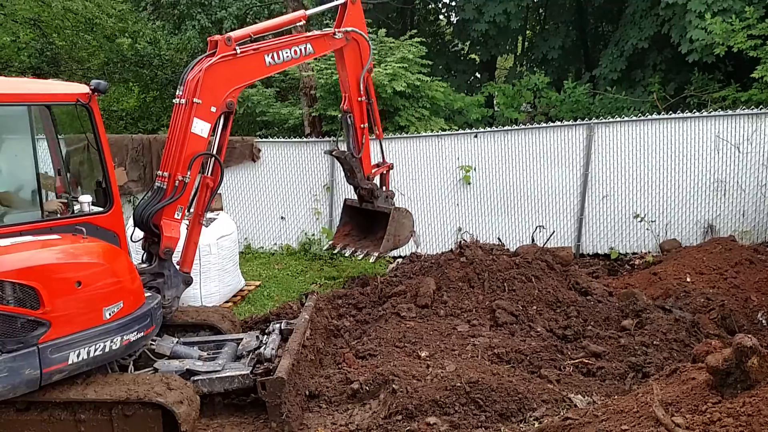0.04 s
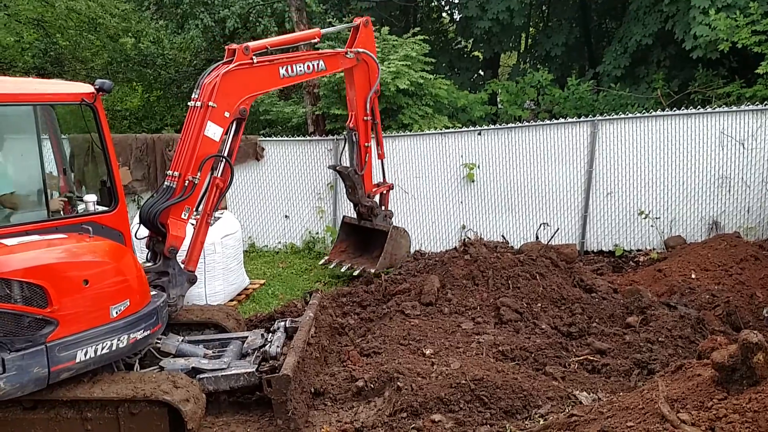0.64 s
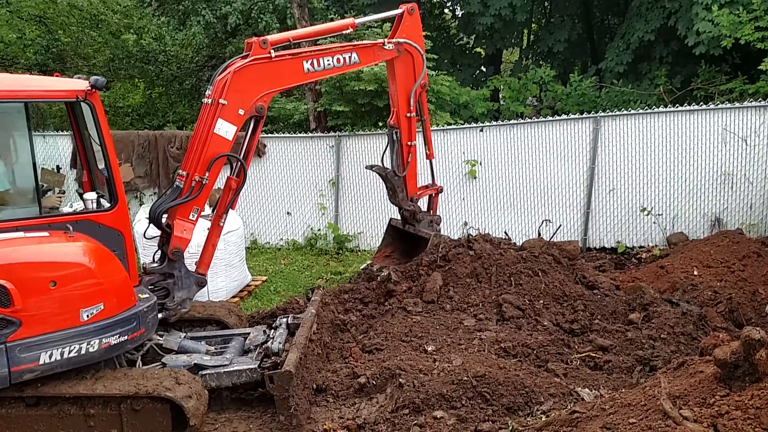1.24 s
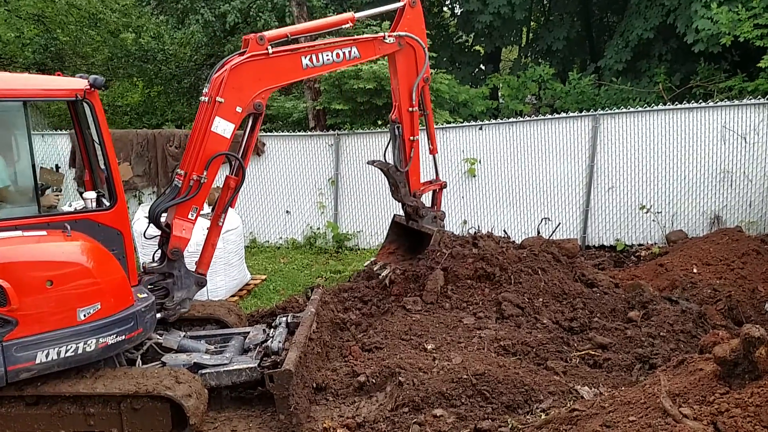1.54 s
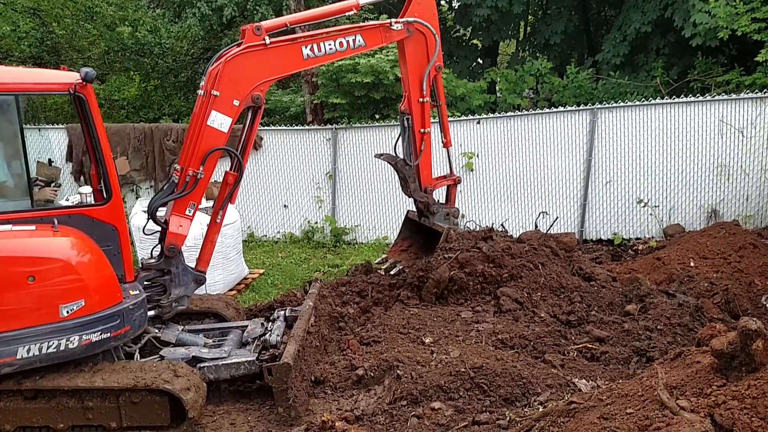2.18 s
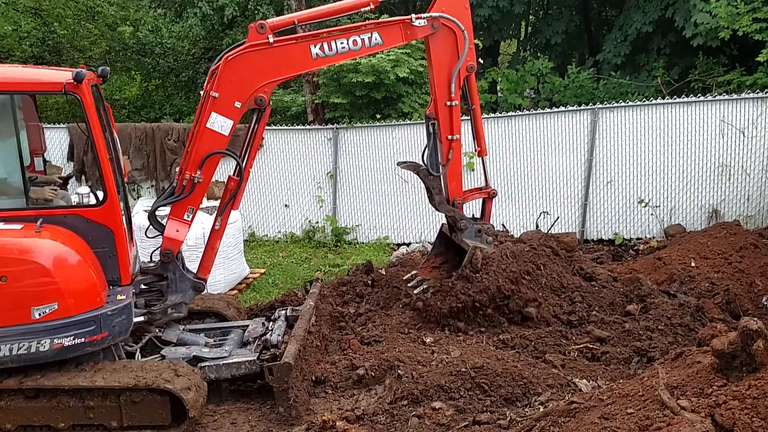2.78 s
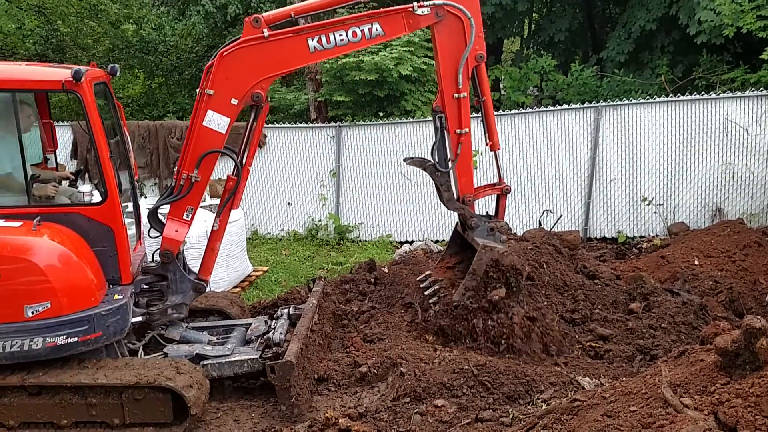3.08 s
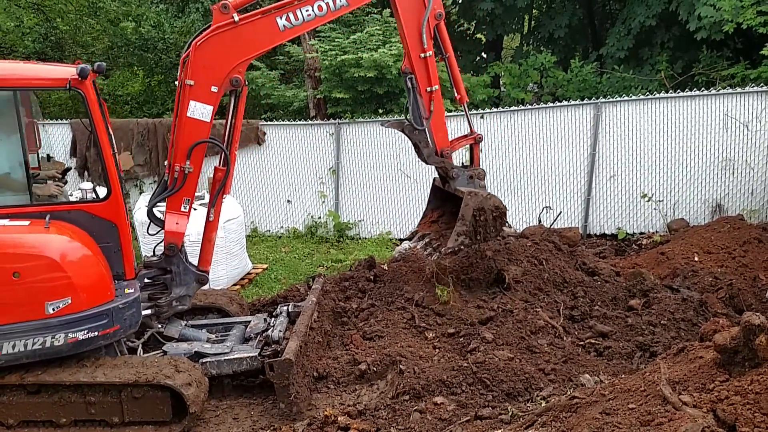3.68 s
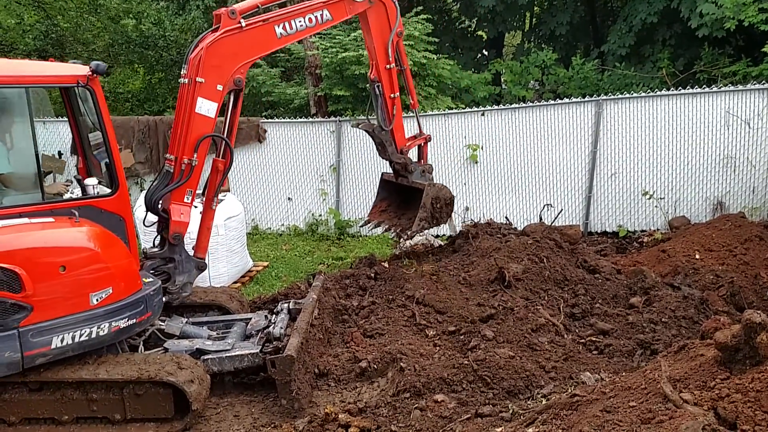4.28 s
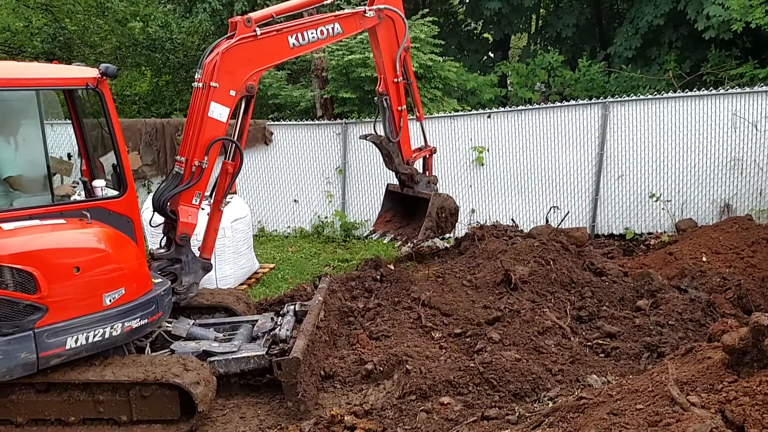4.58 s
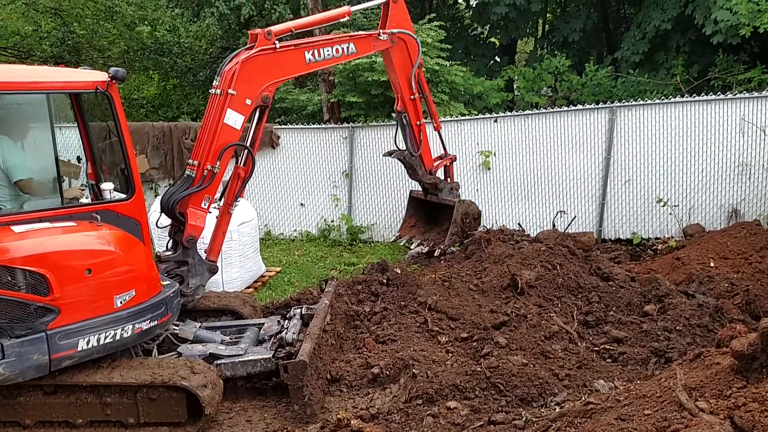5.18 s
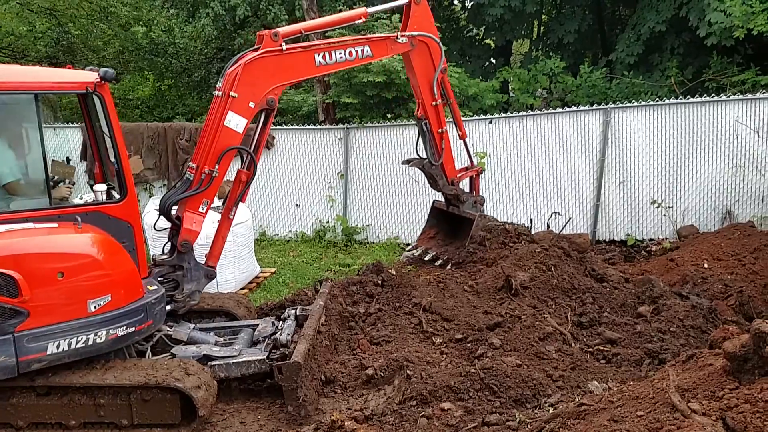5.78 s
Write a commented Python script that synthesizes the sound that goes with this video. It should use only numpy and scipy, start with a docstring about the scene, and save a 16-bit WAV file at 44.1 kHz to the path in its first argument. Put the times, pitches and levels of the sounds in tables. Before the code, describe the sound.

The diesel engine of a mini excavator drones and labours as it digs soil, its steel bucket knocking now and then.

```python
"""Mini excavator digging soil

A four-cylinder diesel, outdoors a few metres away, sags and recovers with the hydraulic load. Its exhaust
hums on the firing rate, harder as the governor adds fuel, and booms by resonance in the silencer. Cooling
air roars, the block clatters and oil hisses; the steel bucket clanks now and then and scrapes once."""
import sys
import numpy as np
from scipy import signal
from scipy.fft import rfft, irfft, next_fast_len
from scipy.io import wavfile
from scipy.ndimage import uniform_filter1d

SR = 44100
rng = np.random.default_rng(int(sys.argv[2]) if len(sys.argv) > 2 else 0)


def int16_out(signal):
    """Quantize to a 16-bit WAV file."""
    q = np.round(np.clip(np.atleast_2d(signal).T, -1, 1) * 32767)
    wavfile.write(sys.argv[1], SR, q.astype(np.int16))


N = 257091
T = np.arange(N) / SR

# firing rate, sagging as the arm works (t/s, f/Hz)
FIRING_RATE = [(0.0, 64.57), (0.58, 64.26), (0.78, 61.12), (1.15, 61.08), (1.65, 58.22), (1.95, 57.38),
               (2.75, 59.68), (2.96, 64.2), (3.27, 61.27), (3.42, 57.57), (3.8, 57.08), (4.06, 64.81),
               (4.5, 64.63), (4.9, 62.53), (5.18, 61.98), (5.36, 64.44), (5.6, 56.5), (5.83, 60.13)]
# upper exhaust tones; unequal cylinders give quarter steps (multiple of firing rate, relative level/dB)
EXHAUST_ORDERS = [(3, 0), (3.25, -3.5), (3.5, 0)]
# swells and ebbs of the boom (centre t/s, length/s, level change/dB)
BOOM_SWELLS = [(0.93, 0.33, 3), (1.253, .1, 6.5), (1.75, .1, 3.5), (1.97, .06, 4.5), (2.26, .09, 5),
               (2.49, .07, 4), (2.672, 0.078, 7), (2.865, .15, 7), (3.395, 0.23, -5), (3.87, 0.092, 9),
               (4.026, 0.14, 4.5), (4.315, 0.067, 8), (4.511, .07, 6.5), (5.66, .16, 4.5)]
# injection knock of each cylinder in firing order (relative level/dB)
CYLINDER_KNOCKS = [0, -3.5, -3, -7]
# blows on bucket and linkage (t/s, level/dB, tilt/(dB per octave), relative ring level/dB)
IMPACTS = [(3.065, -25, -1.8, 1), (3.086, -26.5, -2, -1), (3.098, -29, -3, -8), (3.118, -26.5, -3.5, -7),
           (3.313, -37, 0, -2.5), (3.979, -26, -2, -7), (4.064, -21.5, -.7, -4), (4.647, -29, -7, -4.5),
           (4.855, -25, -7, -10), (5.455, -17, -.2, -10), (5.471, -23.5, -1.3, 0), (5.511, -31, -1.5, -4)]
# modes of the bucket (f/Hz, width/Hz before scaling by the damping factor, relative level/dB)
BUCKET_MODES = [(577, 88, -6), (674, 55, -3.5), (780, 27, -6.5), (1024, 41, -5), (1180, 64, -13.5),
                (1643, 37, -6.5), (1646, 27, -9), (1810, 45, -9), (2260, 78, -12.5), (2510, 44, -19.5),
                (2800, 55, -20), (3330, 53, -19), (3720, 60, -24.5), (4460, 56, -33)]
# oil flow as the arm is lowered and swung (start t/s, hold/s, level/dB)
VALVE_OPENINGS = [(-0.2, 0.84, -25), (4.025, .55, -23), (4.697, .3, -29)]
# fan and pump tones (multiple of firing rate, level/dB)
WHINE_ORDERS = [(4, -37), (4.75, -35), (5, -35.5), (6.75, -41), (7.5, -47), (10, -52), (15, -53),
                (19.5, -55), (33, -58)]

# spectral densities (f/Hz, relative level/dB)
SILENCER_SPECTRUM = [(120, -38.5), (160, -14), (180, -5.5), (195, 2.5), (212, -2.5), (240, -8.5),
                     (270, -27.5), (330, -43)]
FAN_SPECTRUM = [(140, -28.5), (240, -2.5), (259, -1), (301, -1.5), (356, -2.5), (403, -4), (493, -10.5),
                (560, -20), (730, -51), (1230, -120)]
RATTLE_SPECTRUM = [(320, -25), (540, -3), (679, -2), (889, 1), (1070, -6.5), (1200, -4.5), (1520, -16),
                   (1950, -11.5), (2700, -25.5), (3510, -55), (5940, -120)]
CONTACT_SPECTRUM = [(250, -26), (480, -2), (660, 6), (820, 5), (1100, -7), (1700, -13.5), (2400, -13.5),
                    (3200, -21.5), (5000, -31), (8000, -43), (12000, -59.5)]
OIL_SPECTRUM = [(2900, -4), (3300, 1.5), (3700, -6.5), (4200, -8), (5000, -8), (6200, -10.5), (7500, -16),
                (8500, -21), (10000, -24.5), (12500, -27), (15400, -30)]
RUMBLE_SPECTRUM = [(15, -22.5), (35, -17.5), (55, -11), (85, -2.5), (110, -3), (150, 0.5), (200, -11),
                   (300, -28.5)]
KNOCK_SPECTRUM = [(600, -10), (900, 1), (1400, 3), (2000, -4.5), (2400, -6.5), (2900, -27)]
PLATE_SPECTRUM = [(900, -20), (1040, 6), (1120, -7.5), (1200, 1), (1330, -13)]
PANEL_SPECTRUM = [(205, -20), (232, 5.5), (255, -10.5), (290, -14), (322, 0), (350, -22)]

UNLOADED_HZ = 65.43  # sag is the firing rate's drop below this, in Hz
CLANK_LEAD_S = .01  # silence ahead of each blow


def silencer(firings, sag):
    """Resonance: gas puffs and the upper exhaust tones boom in the silencer's one strong peak."""
    puffs = noise() * (.5 + bursts(firings, decay=1, scatter_db=1.5))
    overtones = tones(firings, EXHAUST_ORDERS, waver_db=3, waver_rad=.38)
    boom = undb(-1) * colour(puffs, SILENCER_SPECTRUM) + colour(overtones, SILENCER_SPECTRUM)
    return undb(-22.5 - .14 * sag) * even(boom, span_s=.099)


def boom_swing(flutter_db=1.46):
    """Amplitude modulation: a gain of rounded swells and ebbs, with a flutter that the swells subdue."""
    swell_db = sum(db * np.exp(-(2 * (T - s) / length) ** 2) for s, length, db in BOOM_SWELLS)
    return undb(swell_db + flutter_db * walk(24) * undb(-swell_db))


def exhaust_hum(firings, sag, fuel, idle_db=-37.5, full_fuel_db=-16.8):
    """Periodic flow: the tailpipe radiates the firing rate and an octave that grows with the fuel."""
    angle = 2 * np.pi * firings
    octave_db = idle_db + (full_fuel_db - idle_db) * fuel - .73 * sag
    fundamental = undb(-28 + .5 * walk(14)) * np.cos(angle)
    octave = undb(octave_db + .5 * walk(22)) * np.cos(2 * angle)
    return -np.sqrt(2) * (fundamental + octave)


def governor(firing_hz, sag_scale_hz=4.35, flywheel_s=.11):
    """Speed regulation: the fuel share, 0-1, rises with the sag and while the flywheel is run up."""
    acceleration = uniform_filter1d(np.gradient(firing_hz) * SR, int(.15 * SR))
    run_up_hz = flywheel_s * np.maximum(acceleration, 0)
    demand = np.maximum(UNLOADED_HZ - firing_hz + run_up_hz, 0) / sag_scale_hz
    return np.tanh(demand ** 1.4)  # a small sag adds little fuel


def cooling_air(firings, sag):
    """Turbulence: the fan roars in the engine bay, throbbing slightly with the firings."""
    level_db = -24.5 - .21 * sag + .6 * walk(28)
    turbulence = noise() * (.9 + bursts(firings, decay=.11, scatter_db=1))
    return undb(level_db) * even(colour(turbulence, FAN_SPECTRUM), span_s=.095)


def block(firings, sag, lag_cycles=.35):
    """Impact excitation: gears and valves rattle the block; injections knock, one cylinder hardest."""
    injections = firings - lag_cycles
    cylinder = np.floor(injections).astype(int) % len(CYLINDER_KNOCKS)
    blows = bursts(injections, decay=.55, scatter_db=2) * undb(CYLINDER_KNOCKS)[cylinder]
    knocks = undb(-11) * colour(noise() * blows, KNOCK_SPECTRUM)
    chatter = noise() * (3 + bursts(2 * firings, decay=.99, scatter_db=3.5))
    rattle = colour(chatter, RATTLE_SPECTRUM) * undb(.5 * walk(14))
    return undb(-34 - .36 * sag) * (rattle + knocks)


def clank(tilt_db, ring_db, crack_t60_s=.059, damping=.63, push_db=-2.5):
    """Free vibration: after a push and a crack of contact, the steel's modes ring, damped by soil."""
    t = np.maximum(T[:SR // 2] - CLANK_LEAD_S, 0)
    attack = 1 - np.exp(-(t / .0011) ** 2)
    contact = attack * np.exp(-np.log(1000) * t / crack_t60_s)
    push = colour(-signal.unit_impulse(len(t), np.argmax(contact)), CONTACT_SPECTRUM)
    push *= undb(push_db) / np.abs(push).max()
    crack = colour(rng.standard_normal(len(t)) * contact, CONTACT_SPECTRUM) * rms(contact)
    ring = np.zeros(len(t))
    for hz, width, db in BUCKET_MODES:
        # every blow lands elsewhere, so the modes differ a little in strength and pitch
        strength = undb(db + .46 * rng.standard_normal())
        mode_hz = hz * (1 + .0031 * rng.standard_normal())
        decay = np.exp(-np.pi * damping * width * t)
        ring += strength * decay * np.sin(2 * np.pi * (mode_hz * t + rng.random()))
    blow = push + crack + undb(ring_db) * attack * ring
    # harder contact tips the sound towards the treble
    octaves = np.log2(np.clip(np.fft.rfftfreq(len(t), 1 / SR), 500, 5000) / 1000)
    return irfft(rfft(blow) * undb(tilt_db * octaves), len(t))


def bucket():
    """Collision: the bucket clanks as it meets stones and its pins take up their play."""
    out = np.zeros(N + SR)
    for s, db, tilt_db, ring_db in IMPACTS:
        hit = undb(db) * clank(tilt_db, ring_db)
        start = int((s - CLANK_LEAD_S) * SR)
        out[start:start + len(hit)] += hit
    return out[:N]


def oil(sag):
    """Flow noise: the pump's hiss follows the speed; an open valve adds hiss and shakes two panel modes."""
    flow = sum(undb(db) * stroke(s, hold, attack_s=.12, release_s=.058) for s, hold, db in VALVE_OPENINGS)
    pump_gain, valve_gain = undb(-59.5 - .21 * sag), undb(-41.5) * flow
    hiss = colour(noise(), OIL_SPECTRUM) * undb(.27 * walk(25))
    drone = even(colour(noise(), PANEL_SPECTRUM), span_s=.095)
    return np.hypot(pump_gain, valve_gain) * hiss + flow * drone


def scrape(median_slip_hz=72.6):
    """Stick-slip friction: the teeth slip unevenly through stony soil and the bucket's plate groans."""
    slips = np.cumsum(median_slip_hz * undb(6.8 * walk(30))) / SR
    pressure = stroke(start_s=2.628, hold_s=.14, attack_s=.046, release_s=.025)
    friction = noise() * bursts(slips, decay=.44, scatter_db=0)
    return undb(-40) * pressure * colour(friction, PLATE_SPECTRUM)


def whines(firings):
    """Rotational tones: the fan and pump whine faintly at multiples of the firing rate."""
    return tones(firings, WHINE_ORDERS, waver_db=3.5, waver_rad=.47)


def rumble():
    """Band-limited noise: a steady low rumble lies under the machine."""
    return undb(-31) * colour(noise(), RUMBLE_SPECTRUM)


def tones(firings, orders, waver_db, waver_rad):
    """Engine orders: sinusoids locked to the crankshaft, each wavering in level and phase."""
    out = np.zeros(N)
    for multiple, db in orders:
        amplitude = np.sqrt(2) * undb(db + waver_db * walk(5))
        out += amplitude * np.cos(2 * np.pi * multiple * firings + waver_rad * walk(5))
    return out


def bursts(cycles, decay, scatter_db):
    """Relaxation: an envelope jumps at each whole cycle, then falls with time constant decay/cycles."""
    number = np.floor(cycles).astype(int)
    strengths = undb(scatter_db * rng.standard_normal(1024))
    return strengths[number] * np.exp(-(cycles - number) / decay)


def stroke(start_s, hold_s, attack_s, release_s):
    """Envelope of one movement: a linear rise, then exponential decay from hold_s after the start."""
    elapsed = T - start_s
    return np.clip(elapsed / attack_s, 0, 1) * np.exp(-np.maximum(elapsed - hold_s, 0) / release_s)


def colour(x, spectrum):
    """Spectral shaping: filter x to rms 1, with skirts of 36 dB per octave beyond the table."""
    hz, db = np.transpose(spectrum)
    size = next_fast_len(len(x) + 4096)
    f = np.fft.rfftfreq(size, 1 / SR) + 1
    skirt_db = -36 * np.abs(np.log2(f / np.clip(f, hz[0], hz[-1])))
    gain = undb(np.interp(np.log(f), np.log(hz), db) + skirt_db)
    shaped = irfft(rfft(x, size) * gain, size)[:len(x)]
    return shaped / rms(shaped)


def even(x, span_s):
    """Normalisation: hold the running rms near 1; flutter quicker than the span stays."""
    return x / np.sqrt(uniform_filter1d(x ** 2, int(span_s * SR)))


def walk(rate_hz):
    """Random modulation: held values, smoothed twice, with a spread near 1."""
    hold = int(SR / rate_hz)
    steps = np.repeat(rng.standard_normal(N // hold + 1), hold)
    return 1.2 * uniform_filter1d(uniform_filter1d(steps, hold), hold)[:N]


def noise():
    """White Gaussian noise."""
    return rng.standard_normal(N)


def rms(x):
    """Root-mean-square amplitude."""
    return np.sqrt(np.mean(x ** 2))


def undb(db):
    """Decibels to amplitude ratio."""
    return 10 ** (np.asarray(db) / 20)


def scene():
    """Superposition: the sounds of one crankshaft add to those of the digging and a low rumble."""
    firing_hz = np.interp(T, *np.transpose(FIRING_RATE))
    sag = UNLOADED_HZ - firing_hz
    firings = np.cumsum(firing_hz) / SR  # phase in firing cycles
    hum = exhaust_hum(firings, sag, governor(firing_hz))
    boom = boom_swing() * silencer(firings, sag)
    machine = hum + boom + cooling_air(firings, sag) + rumble() + whines(firings) + block(firings, sag)
    return (machine + oil(sag) + bucket() + scrape())[None]


def record(dry):
    """Low-pass filtering: the treble is cut steeply above 15.5 kHz."""
    return signal.sosfilt(signal.ellip(10, .1, 80, 15500, fs=SR, output="sos"), dry)


dry = scene()
out = record(dry)
int16_out(out)
```